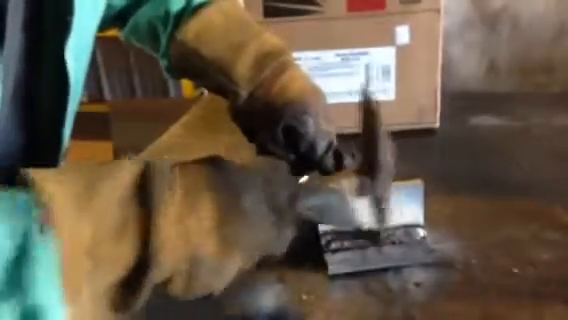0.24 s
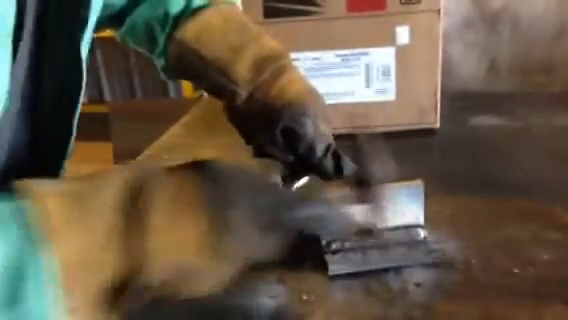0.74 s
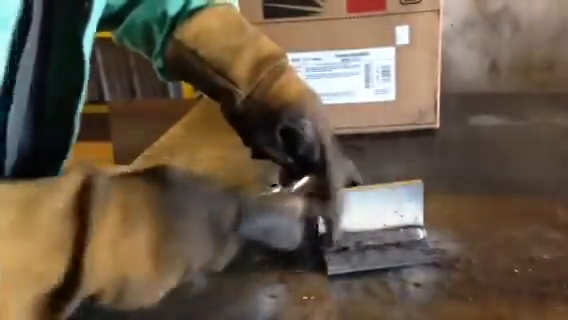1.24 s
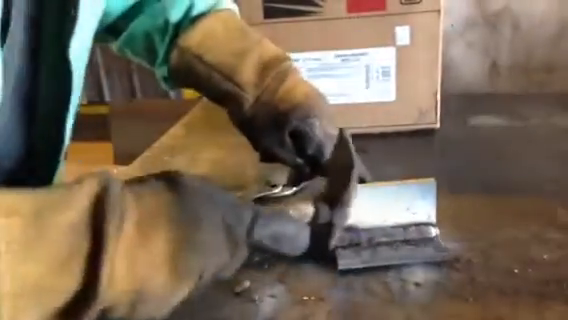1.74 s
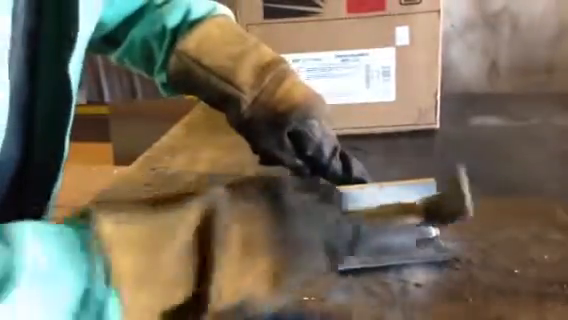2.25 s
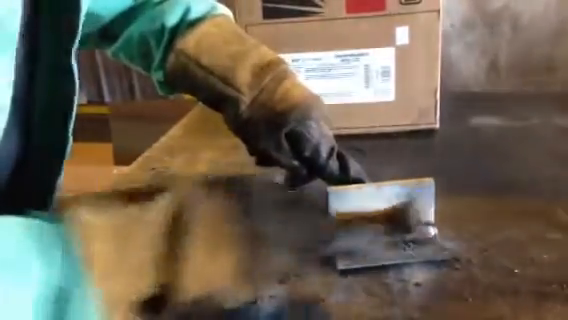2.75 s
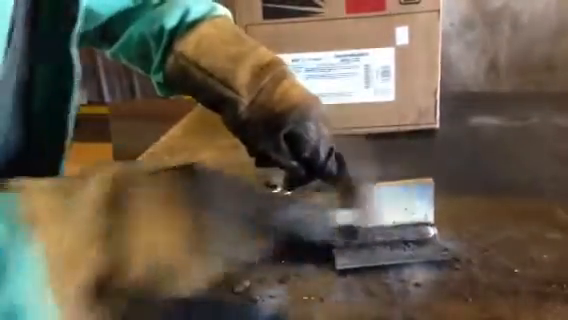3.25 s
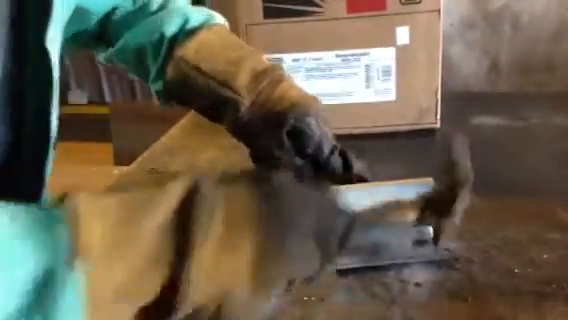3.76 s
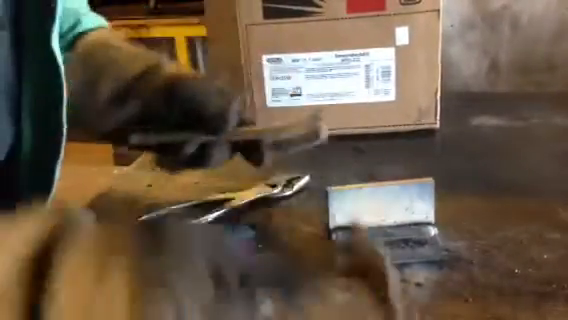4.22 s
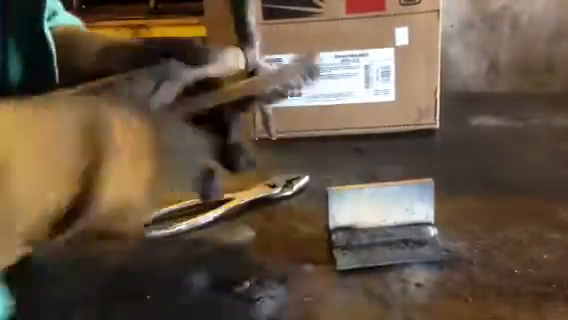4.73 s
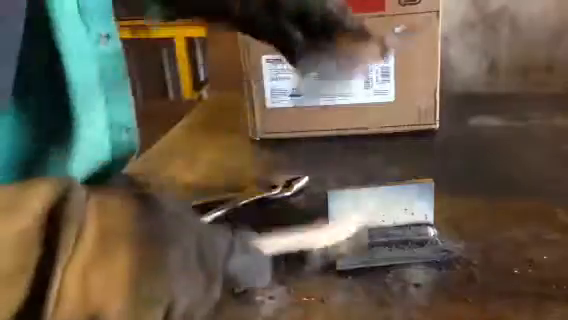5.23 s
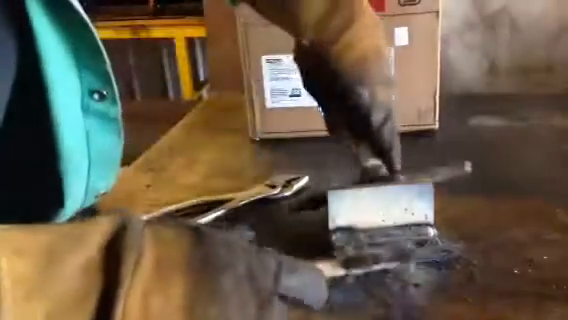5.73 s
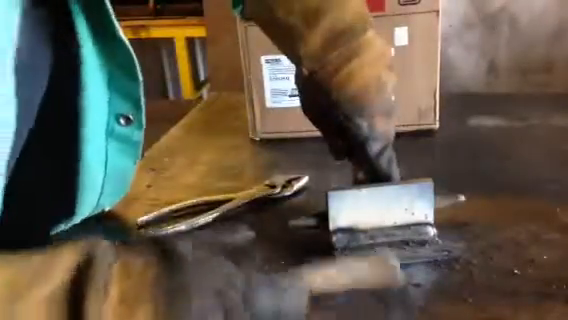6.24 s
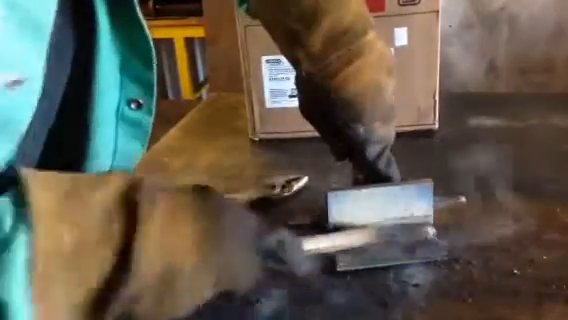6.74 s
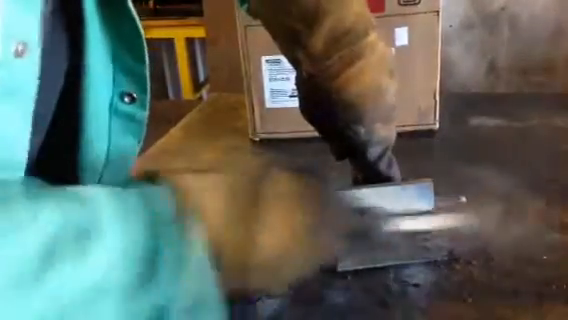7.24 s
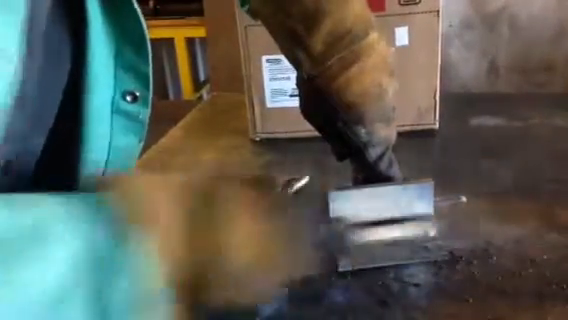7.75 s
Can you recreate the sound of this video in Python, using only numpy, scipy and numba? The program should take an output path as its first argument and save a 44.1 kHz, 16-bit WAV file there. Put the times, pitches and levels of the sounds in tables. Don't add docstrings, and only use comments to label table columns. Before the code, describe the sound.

Irregular hard clanks and gritty scrapes come first, a small steel plate rattling on a steel bench with high pinging from the hammer tip. After a brief gap the chipping resumes, then tools drop with a bright clink and thuds. A quieter stretch follows, one last knock, then crisp, hissing back-and-forth brush strokes. A reverberant workshop with low airy hum, heard through a phone microphone with limited peaks.

```python
import sys
import numpy as np
from scipy import signal
from scipy.fft import rfft, irfft
from scipy.io import wavfile
from scipy.ndimage import uniform_filter1d
from numba import njit

SR = 44100
rng = np.random.default_rng(int(sys.argv[2]) if len(sys.argv) > 2 else 0)


def makeup_ratio(level_db):
    decades = np.asarray(level_db, float) / 20
    return 10 ** decades


def pcm_store(signal):
    levels = np.round(np.clip(np.atleast_2d(signal), -1, 1) * 32767)
    wavfile.write(sys.argv[1], SR, levels.astype(np.int16).T)


N = 351918
T = np.arange(N) / SR


def level(x, db):
    return x * makeup_ratio(db) / np.sqrt(np.mean(x ** 2))


def unit(x):
    return x / np.sqrt(np.sum(x ** 2))


def colour(x, points):
    hz, db = np.transpose(points)
    f = np.maximum(np.fft.rfftfreq(len(x), 1 / SR), 1)
    gain = makeup_ratio(np.interp(np.log(f), np.log(hz), db))
    return irfft(rfft(x) * gain, len(x))


def band(x, lo_hz, hi_hz):
    sos = signal.butter(2, [lo_hz, min(hi_hz, SR / 2 - 500)], "band", fs=SR, output="sos")
    return signal.sosfilt(sos, x)


def ring(modes):
    longest = max(t60 for _, _, t60 in modes)
    t = T[:int(SR * min(longest, 1))]
    return sum(makeup_ratio(db - 60 * t / t60) * np.sin(2 * np.pi * hz * t) for hz, db, t60 in modes)


def taps(times, gains):
    return np.bincount((np.asarray(times) * SR).astype(int), gains, N)[:N]


def grit(rate, spread_db):
    hit = rng.random(N) < rate / SR
    size_db = spread_db * np.minimum(rng.exponential(size=N), 3)
    return level(hit * rng.choice([-1, 1], N) * makeup_ratio(size_db), 0)


def play(x, response):
    return signal.oaconvolve(x, response)[:N]


def strike(hits, response):
    out = np.zeros(N)
    for s, db in hits:
        i = int(s * SR)
        out[i:i + len(response)] += makeup_ratio(db) * response
    return out


def walk(rate):
    steps = rng.standard_normal(int(N / SR * rate) + 2)
    return 1.2 * np.interp(T * rate, np.arange(len(steps)), steps)


def strokes(start, length, db, rise, fall):
    start, length = start[:, None], length[:, None]
    t = T[::64]
    early = np.maximum(start - t, 0)
    late = np.maximum(t - start - length, 0)
    gain = makeup_ratio(db[:, None] - rise * early - fall * late)
    return np.interp(T, t, gain.sum(axis=0))


def echoes(x, wet_db, t60):
    t = T[:SR]
    build = np.minimum(t / 0.021, 1)
    tail = rng.standard_normal(SR) * makeup_ratio(-60 * t / t60) * build
    return x + makeup_ratio(wet_db) * play(x, unit(tail))


# frequency in Hz, density in dB per Hz.
AIR_SPECTRUM = [(15, -50), (25, -16), (59, -14), (92, -9), (120, -10), (200, -12.5), (309, -19), (695, -14),
                (887, -17), (2280, -26.5), (5000, -31), (6800, -36), (15300, -45.5)]
# multiple of the turning speed, level in dB.
MOTOR_ORDERS = [(1, -15.5), (3, 3), (5, -10), (6.5, -11), (20, -17), (22, -9), (24, -11.5)]
# time in seconds, level of the third order in dB.
HUM_LEVEL = [(0.0, -31), (0.15, -33), (0.47, -62), (0.58, -41), (0.78, -43), (1.2, -68), (1.53, -39.5),
             (2.69, -49), (3.27, -37), (3.56, -68), (3.69, -49.5), (5.27, -39), (5.33, -38), (5.45, -43),
             (7.87, -43.5), (7.98, -42)]


def shop():
    motor_hz = 31.65 * (1 + 0.0032 * walk(2.5))
    turn = 2 * np.pi * np.cumsum(motor_hz) / SR
    air = level(colour(rng.standard_normal(N), AIR_SPECTRUM), -42.5)
    throb = 1 + 0.087 * np.sin(turn)
    s, db = np.transpose(HUM_LEVEL)
    hum_gain = np.minimum(makeup_ratio(np.interp(T, s, db)), makeup_ratio(-40))
    hum = sum(makeup_ratio(db - 0.5 + 2.3 * walk(10.5)) * np.sin(k * turn) for k, db in MOTOR_ORDERS)
    return air * throb + hum_gain * hum


# frequency in Hz, level in dB, steel t60 and shop t60 in seconds.
BENCH_RINGING = [(98, -7.5, 0.15, 0.26), (270, -9, 0.14, 2.6), (580, 6, 0.06, 0.69),
                 (1170, 4.5, 0.035, 0.88), (1890, -0.5, 0.28, 1.39), (3400, -16, 0.17, 1.4),
                 (4200, -6.5, 0.15, 1.3), (6750, -9.5, 0.21, 0.18), (10900, -21, 0.055, 0.32),
                 (13300, -25, .06, .25)]
# frequency in Hz, level in dB, t60 in seconds.
PLATE_MODES = [(262, -3, .5), (332, 4, .55), (489, -6, .35), (540, -5, .3), (697, -6, .3), (770, 0, .35),
               (1044, -6, .3), (1455, -5, .2)]


def bench_response():
    hz, *columns = np.transpose(BENCH_RINGING)
    t, out = T[:SR], 0
    for f in 80 * 2 ** np.arange(0, 7.6, 1 / 3):
        db, steel, shop_t60 = (np.interp(np.log(f), np.log(hz), c) for c in columns)
        late = makeup_ratio(-15.5 - 60 * t / shop_t60) * np.minimum(t / 0.029, 1)
        decay = makeup_ratio(-60 * t / steel) + late
        noise = band(rng.standard_normal(SR), f / 1.201, f * 1.05)
        out = out + makeup_ratio(db) * noise * decay / np.sqrt(f / 1000)
    plate = ring(PLATE_MODES)
    out[:len(plate)] += makeup_ratio(-25) * plate
    crack = band(rng.standard_normal(SR), 49, 3250) * makeup_ratio(-60 * t / 0.017)
    return unit(out + makeup_ratio(5.5) * crack)


# start in seconds, clank level in dB, weight and edge in dB above the clank, chatter in seconds.
FIRST_PASS_BANGS = [(0.003, -9.5, -20, -4, 0.019), (0.141, -8.5, -7, 3, 0.054),
                    (0.541, -19, -30, -6, 0.017), (0.624, -18.5, -3.5, -29, 0.023),
                    (0.724, -17, -24, -20, 0.011), (0.79, -25, 6.5, -5, 0.033),
                    (0.832, -19.5, 1, 12, 0.025), (0.864, -14.5, -15, -24, 0.02),
                    (0.997, -19, -29, -2.5, 0.023), (1.263, -12.5, -9, -1, 0.038),
                    (1.299, -14, -41, -12, 0.017), (1.485, -17, -2.5, -21, 0.017),
                    (1.506, -8, -20, -3, 0.063), (1.666, -15.5, -16, 5, 0.0058),
                    (1.689, -16.5, -12, -14, 0.023)]
SECOND_PASS_BANGS = [(2.377, -15, -8.5, 12.5, 0.069), (2.416, -13.5, -10, -18, 0.035),
                     (2.769, -20, -7, 0.5, 0.019), (2.828, -23, -21, 14.5, 0.0093),
                     (2.871, -13.5, -9.5, -28, 0.024), (2.917, -19, -11, -31, 0.071),
                     (3.068, -18.5, -5.5, -36, 0.022), (3.106, -21, -12, -27, 0.061),
                     (3.354, -12, -8.5, -17, 0.016), (3.456, -11.5, -10.5, 0, 0.015),
                     (3.527, -19, -12, -21, 0.063), (3.648, -14.5, -8, -34, 0.0079),
                     (3.668, -24.5, -22, 11, 0.012), (3.732, -14.5, -12.5, -42, 0.02)]
LAYING_DOWN_BANGS = [(3.985, -21, -35, 3, 0.015), (4.008, -27.5, 2.5, -11, 0.087),
                     (4.188, -5.5, -13.5, 6.5, 0.029), (4.215, -10, -7.5, -36, 0.022),
                     (5.961, -11, -18, -28, 0.051), (5.97, -15.5, -3.5, 3, 0.012),
                     (5.989, -16.5, -20, 8.5, 0.013)]
# start and length in seconds, then hammer ring, bench rattle and bench rumble in dB.
SCRAPES = [(0.0, 0.035, -30, -12.5, -15.5), (0.146, 0.053, -21, -10.5, -18),
           (0.298, 0.063, -28, -30.5, -41), (0.434, 0.051, -25.5, -26.5, -31),
           (0.57, 0.056, -32, -27.5, -29.5), (0.69, 0.067, -22, -21.5, -22.5),
           (0.829, 0.05, -35, -13, -16.5), (0.986, 0.051, -26.5, -45, -34), (1.082, 0.057, -30, -26.5, -23),
           (1.226, 0.058, -32, -20.5, -24), (1.502, 0.048, -39, -14, -19.5), (1.668, .03, -46, -25.5, -32),
           (2.481, .09, -46, -24, -32.5), (2.663, 0.052, -38, -28.5, -33), (2.814, 0.034, -41, -15, -17.5),
           (2.93, 0.064, -39, -33, -29.5), (3.082, 0.064, -36, -24.5, -21.5),
           (3.221, 0.071, -32.5, -27, -31), (3.351, 0.092, -36.5, -17, -19), (3.516, 0.058, -31, -28, -26),
           (3.646, 0.077, -39, -23.5, -22.5), (4.542, .12, -70, -37, -54)]


def piece():
    response, out = bench_response(), 0
    bangs = FIRST_PASS_BANGS + SECOND_PASS_BANGS + LAYING_DOWN_BANGS
    s, clank_db, weight_db, edge_db, chatter = np.transpose(bangs)
    bounces = grit(1400, 4.1)
    layers = [(weight_db, 60, 500), (0 * clank_db, 500, 1500),
              (edge_db, 1500, 4500), (edge_db - 12, 4500, 15000)]
    for extra_db, lo_hz, hi_hz in layers:
        gains = makeup_ratio(clank_db + extra_db)
        spell = np.zeros(N)
        for t0, gain, d in zip(s, gains, chatter):
            i = int(t0 * SR)
            spell[i:i + SR // 4] += gain * np.exp(-(T[:SR // 4] / d) ** 3)
        part = unit(band(response, lo_hz, hi_hz))
        blows = makeup_ratio(4) * taps(s, gains) / np.max(np.abs(part))
        out = out + play(blows + makeup_ratio(-8) * spell * bounces, part)
    start, length, _, rattle_db, rumble_db = np.transpose(SCRAPES)
    contacts = grit(900, 2.2)
    rattle = strokes(start, length, rattle_db, rise=910, fall=187) * contacts
    rumble = strokes(start, length, rumble_db, rise=300, fall=395) * contacts
    out = out + makeup_ratio(-3.5) * play(rattle, unit(band(response, 374, 3420)))
    return out + makeup_ratio(-6.5) * play(rumble, unit(band(response, 270, 347)))


# start in seconds, ring level in dB, share of the top modes in dB.
SLAG_CATCHES = [(0.3052, -22.5, -27), (0.436, -37, -16), (0.5482, -29, -3), (0.568, -22, 4),
                (0.596, -21, 0), (0.623, -29, -3), (0.6843, -32, -13), (0.7275, -12.5, -16),
                (0.8104, -18, -4), (0.8589, -24, -25), (0.977, -37, 5), (0.9984, -17.5, 3),
                (1.2276, -40, -19), (1.2624, -16, -8), (1.4855, -21, -15), (1.508, -22, -10),
                (1.5287, -19, -22), (1.5953, -38, 7), (1.6627, -13, -18), (1.71, -26, -4), (2.38, -10, -9),
                (2.57, -38, -7), (2.7688, -24, -28), (2.831, -29, -33), (2.9594, -35, 8),
                (2.9805, -18, -0.5), (3.077, -48, 13), (3.154, -24, 1), (3.2585, -27, 0), (3.565, -38, -4)]
# frequency and split in Hz, level in dB, t60 in seconds.
HEAD_MODES = [(4100, 180, -10, 0.01), (4530, 110, -10.5, 0.0081), (6740, 28, -4.5, 0.035),
              (7360, 72, -8.5, 0.061), (8200, 80, -14, 0.0095), (10520, 10, -4.5, 0.11),
              (10750, 49, -5, 0.019), (12520, 100, -2, 0.016), (13600, 64, -13, 0.023),
              (14600, 30, -16, .06)]


def hammer():
    s, db, top_db = np.transpose(SLAG_CATCHES)
    start, length, ring_db = np.transpose(SCRAPES)[:3]
    slide = strokes(start, length, ring_db, rise=1000, fall=1260)
    skid = makeup_ratio(-60 * T[:SR // 10] / 0.028)
    bare_steel = makeup_ratio(-9.5 + 2 * np.minimum(T, 4))
    low = makeup_ratio(-7) * slide + makeup_ratio(-2) * play(taps(s, makeup_ratio(db)), skid)
    top = makeup_ratio(-8.5) * slide * bare_steel + makeup_ratio(-5.5) * play(taps(s, makeup_ratio(db + top_db)), skid)
    slag = grit(1000, 4.3)
    out = makeup_ratio(-36) * (band(low * slag, 3500, 6200) + band(top * slag, 13000, 13500))
    for hz, split, gain_db, t60 in HEAD_MODES:
        pair = unit(ring([(hz - split, 0, t60), (hz + split, -2.5, t60)])[:SR // 5])
        push = (top if hz > 9500 else low) * makeup_ratio(gain_db + 4 * walk(14))
        out = out + play(push * np.roll(slag, rng.integers(N)), pair)
    return echoes(out, -9.5, 0.24)


# time in seconds, level in dB.
CONTACT_TICKS = [(1.376, -38), (1.451, -40), (1.463, -42), (4.649, -33), (4.085, -33.5), (4.127, -33),
                 (4.174, -21), (4.181, -32), (5.336, -8), (5.339, -15)]
# hits as time in seconds and level in dB,
# then modes as frequency in Hz, level in dB and t60 in seconds.
TOOL_CLINKS = [
    ([(4.105, -42), (4.174, -27), (4.189, -10)], [(3863, -2.5, 0.4), (3867, -9, 0.41), (3865, -29, 1.5), (4800, -6.5, 0.074), (6450, -10, 0.043), (8300, -15, 0.065)]),
    ([(4.127, -23)], [(3865, 1, 0.046), (4300, -10, 0.038)]),
    ([(5.971, -30.5)], [(7730, 0, 0.18), (7738, -19, 0.53), (4380, 16.5, 0.036), (3740, 13, 0.052), (2320, 15.5, 0.038), (14500, -14, .1)]),
]
# time in seconds, frequency in Hz, level in dB, t60 in seconds.
HANDLE_KNOCKS = [
    (4.173, 356, -12, 0.041),
    (4.173, 680, -13, 0.014),
    (5.333, 131, -9.5, 0.11),
    (5.335, 226, -13.5, 0.055),
    (5.335, 1020, -24, 0.026),
    (5.959, 119, -28, 0.22),
    (5.962, 420, 2.5, 0.0053),
]


def tools_down():
    clinks = sum(strike(hits, ring(modes)) for hits, modes in TOOL_CLINKS)
    out = echoes(clinks, -21, 0.6)
    for s, hz, db, t60 in HANDLE_KNOCKS:
        out = out + strike([(s, db)], band(ring([(hz, 0, t60)]), 82, 3000))
    t = T[:SR // 8]
    decay = makeup_ratio(-60 * t / 0.011) + makeup_ratio(-22.5 - 60 * t / 0.22)
    snap = band(rng.standard_normal(len(t)) * decay, 2800, 8700)
    return out + strike(CONTACT_TICKS, snap)


# start in seconds, length in seconds, level in dB.
BRUSH_STROKES = [(4.644, .02, -54), (4.876, 0.0084, -53), (5.074, 0.027, -51), (6.542, 0.1, -41),
                 (6.728, .07, -42.5), (6.885, 0.08, -36.5), (7.045, 0.071, -41.5), (7.208, 0.064, -37.5),
                 (7.353, 0.068, -40.5), (7.512, 0.059, -36), (7.658, 0.068, -40.5), (7.821, 0.074, -37),
                 (7.975, .05, -41)]
# frequency in Hz, density in dB per Hz.
WIRE_SPECTRUM = [(880, -35), (1500, 8), (1900, -6), (3730, -11.5), (5020, -5), (5880, -3.5), (10000, 8.5),
                 (13500, -0.5), (15500, -5), (16000, -33)]


def brush():
    wires = colour(grit(6000, 1.3), WIRE_SPECTRUM)
    start, length, db = np.transpose(BRUSH_STROKES)
    tips = 0
    for k, (hz, share_db) in enumerate([(8200, -2.5), (10500, -0.5), (13500, -0.5)]):
        lean = k * 0.0054
        sweep = strokes(start + lean, length, db + share_db, rise=320, fall=590)
        flicks = level(band(wires, hz / 1.207, hz * 1.224), 0)
        tips = tips + sweep * flicks * makeup_ratio(1.5 * walk(40))
    scrub = strokes(start, length, db - 5.5, rise=500, fall=360) * level(band(wires, 2120, 5200), 0)
    scrub = scrub * makeup_ratio(0.98 * walk(36))
    steel = ring([(10400, 0, 0.09), (4950, 3, 0.03)])[:SR // 5]
    return tips + scrub + makeup_ratio(-43) * play(tips + scrub, steel)


def scene():
    return (shop() + piece() + hammer() + tools_down() + brush())[None]


@njit
def limit(x, top, release):
    y, envelope = np.empty(len(x)), top
    for i in range(len(x)):
        envelope = max(abs(x[i]), envelope + (top - envelope) * release)
        y[i] = x[i] * top / envelope
    return y


def starve(x, above_hz, below_db):
    hz, _, z = signal.stft(x, SR, nperseg=1024)
    power = uniform_filter1d(np.abs(z) ** 2, size=12, axis=0)
    power = power[6::12].repeat(12, axis=0)[:len(z)]
    keep = (power > makeup_ratio(-2 * below_db) * power.sum(axis=0)) | (hz[:, None] < above_hz)
    return signal.istft(z * keep, nperseg=1024)[1][:N]


def band_limit(x):
    return signal.sosfilt(signal.butter(12, 16500, fs=SR, output="sos"), x)


def record(dry):
    limited = limit(dry[0], 0.7, 1 / (0.03 * SR))
    top_cut = signal.ellip(6, 0.3, 24, 15300, fs=SR, output="sos")
    mix = starve(signal.sosfilt(top_cut, limited), above_hz=12500, below_db=62)
    return band_limit(mix[None])


dry = scene()
out = record(dry)
pcm_store(out)
```